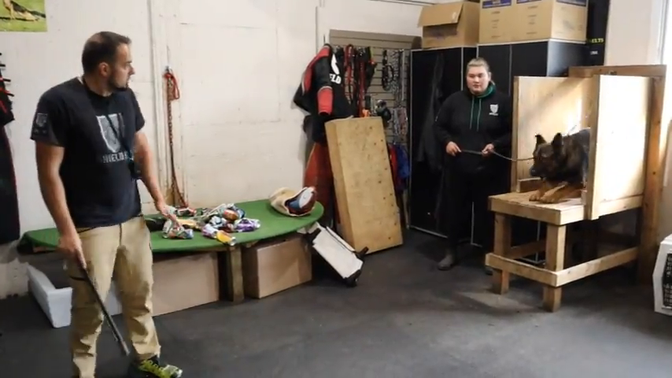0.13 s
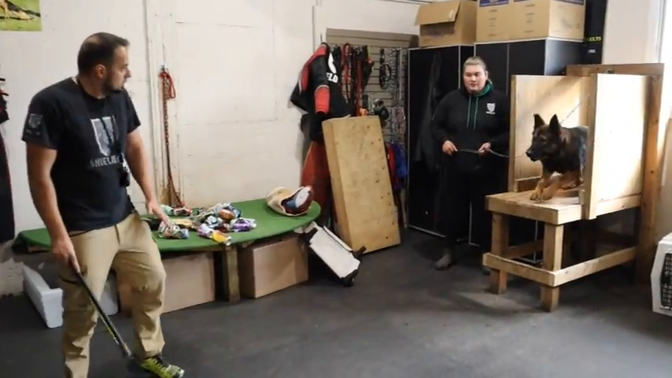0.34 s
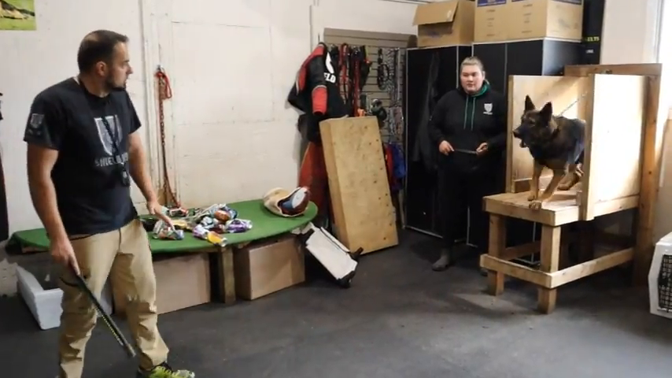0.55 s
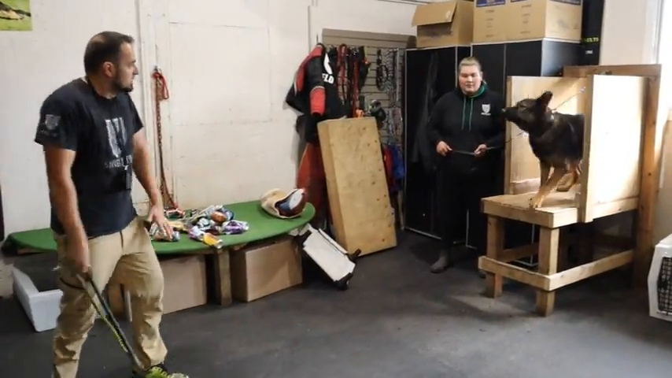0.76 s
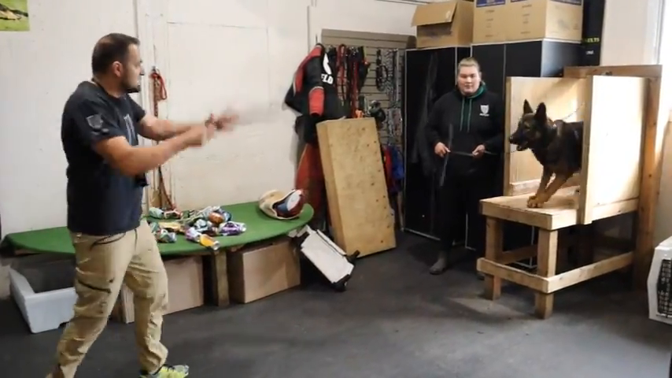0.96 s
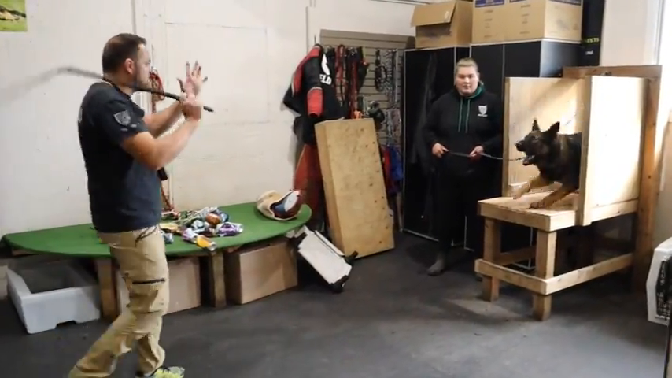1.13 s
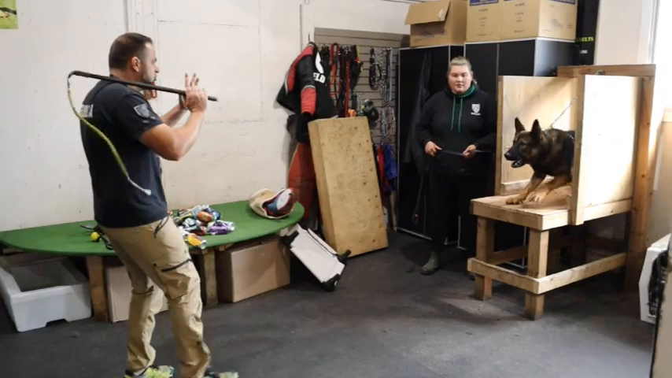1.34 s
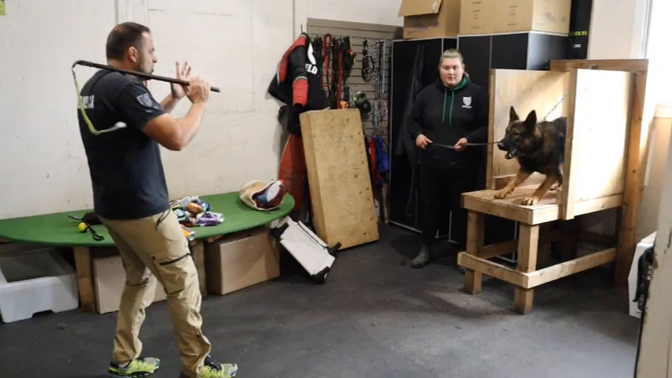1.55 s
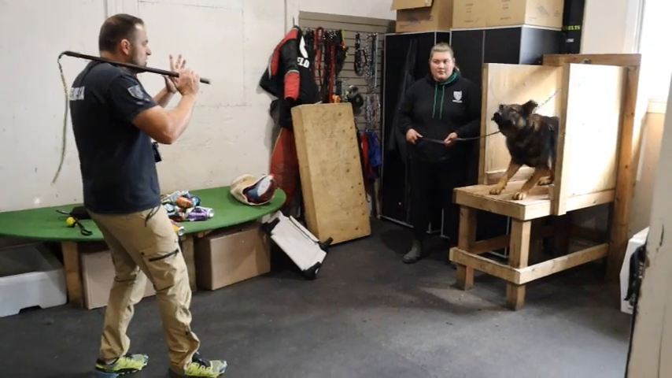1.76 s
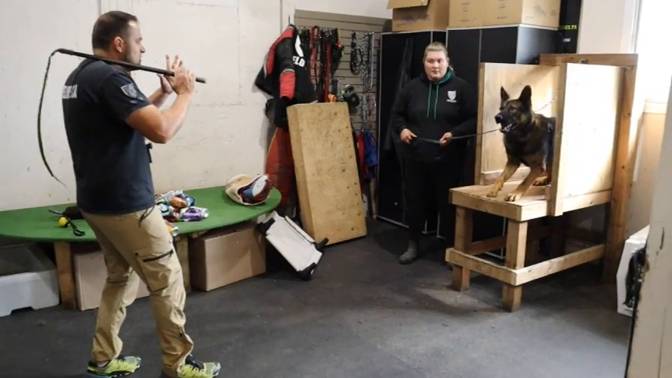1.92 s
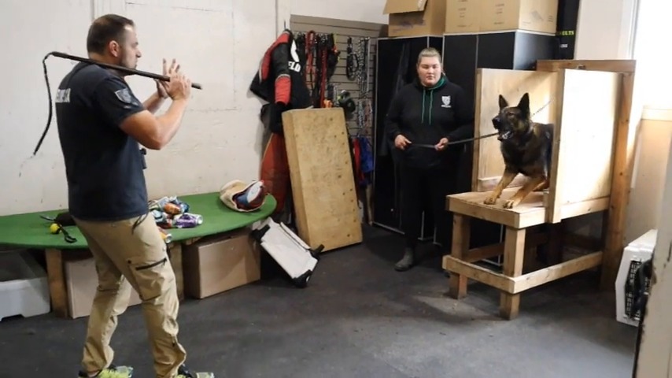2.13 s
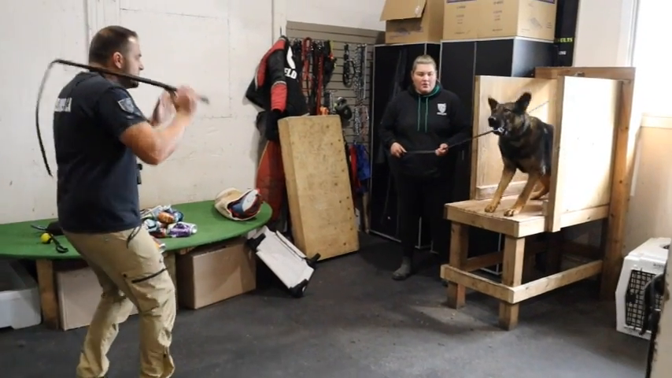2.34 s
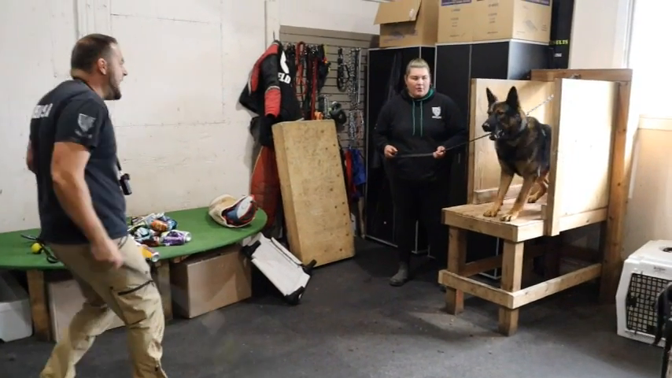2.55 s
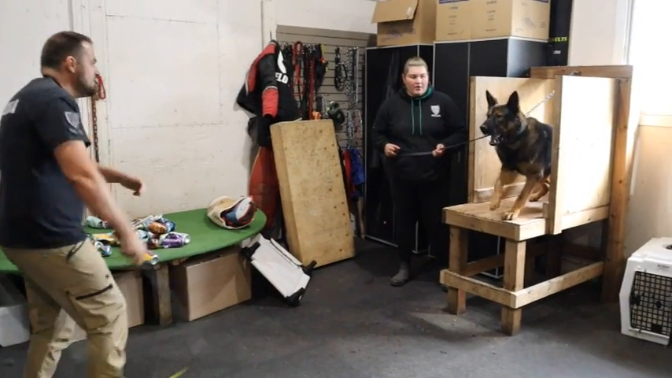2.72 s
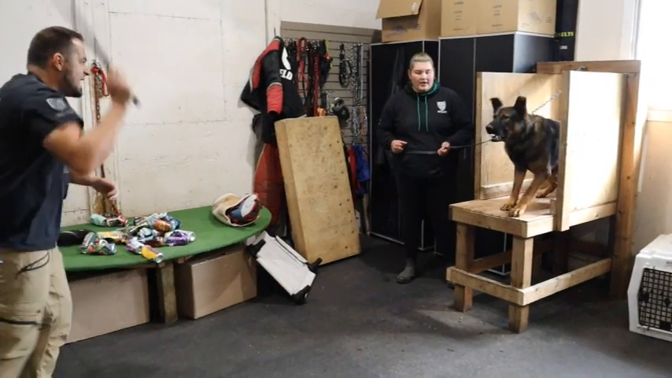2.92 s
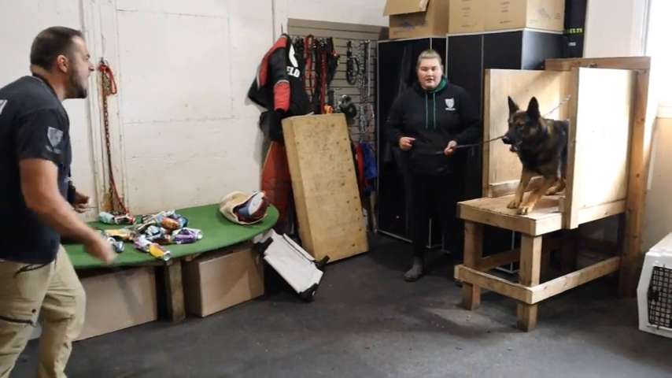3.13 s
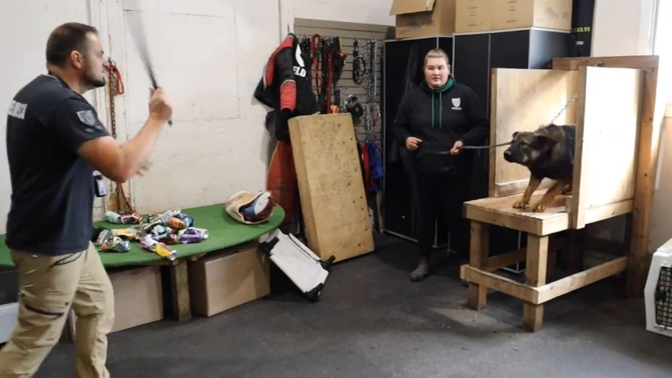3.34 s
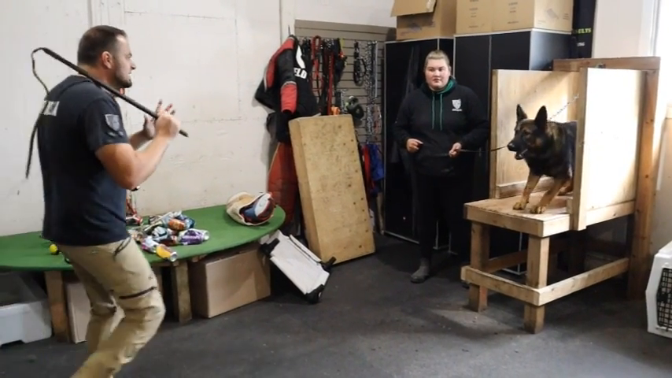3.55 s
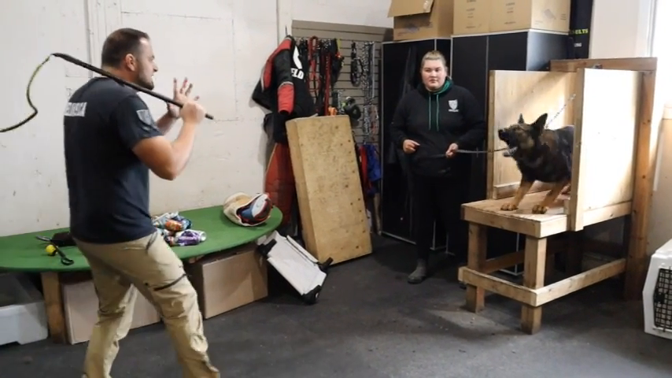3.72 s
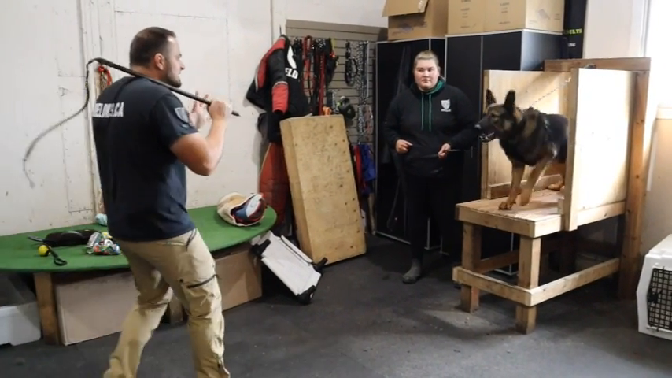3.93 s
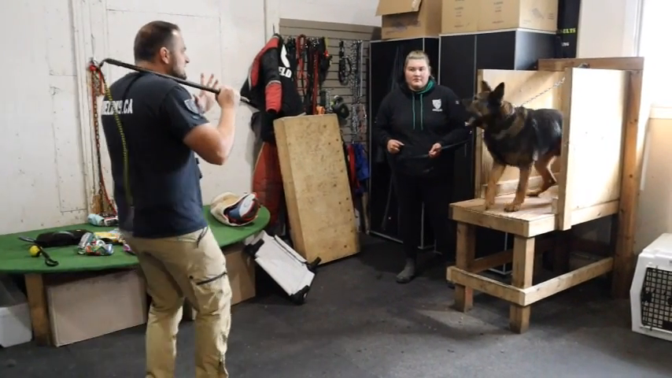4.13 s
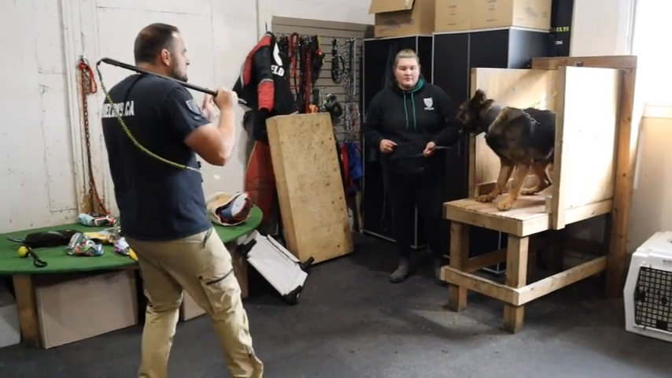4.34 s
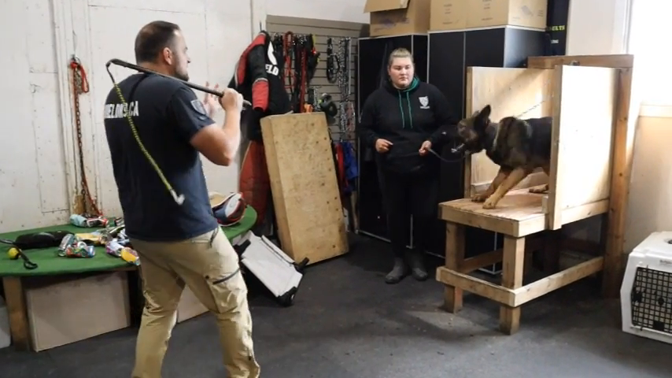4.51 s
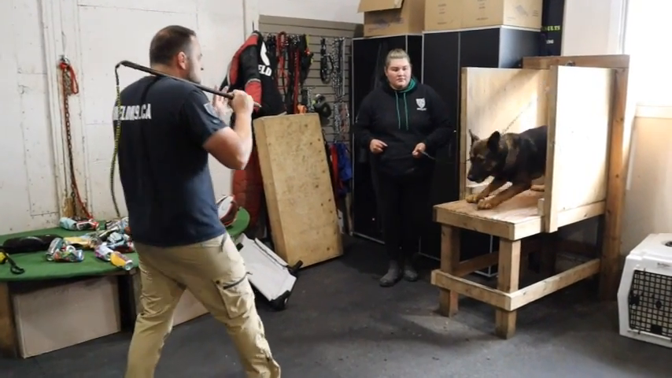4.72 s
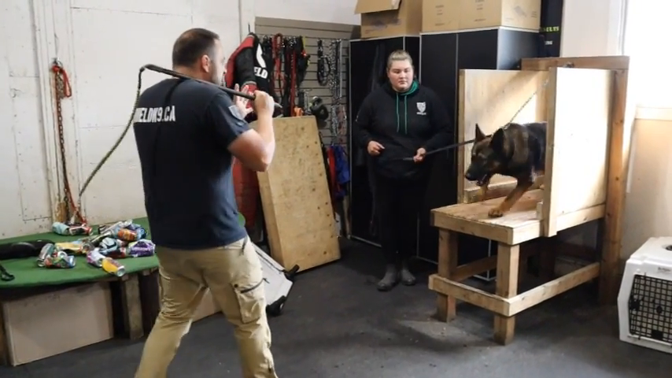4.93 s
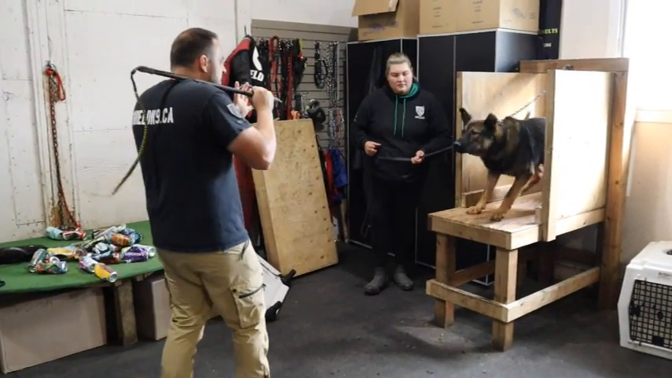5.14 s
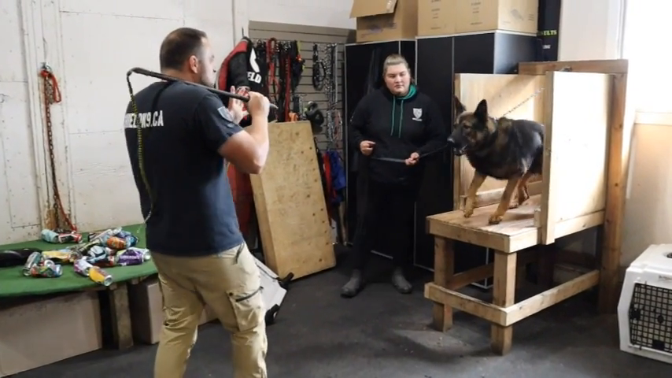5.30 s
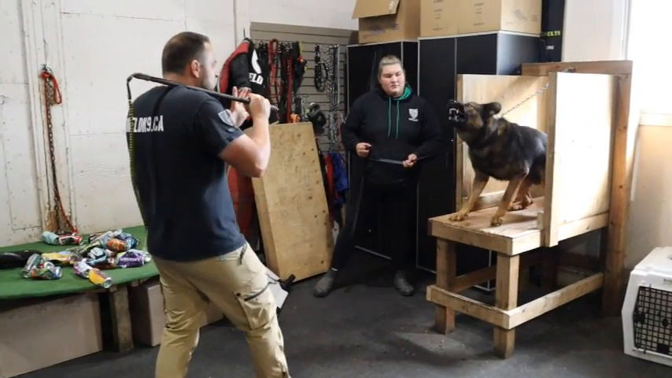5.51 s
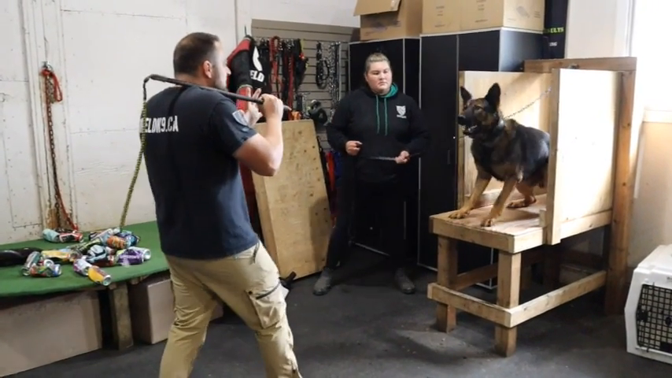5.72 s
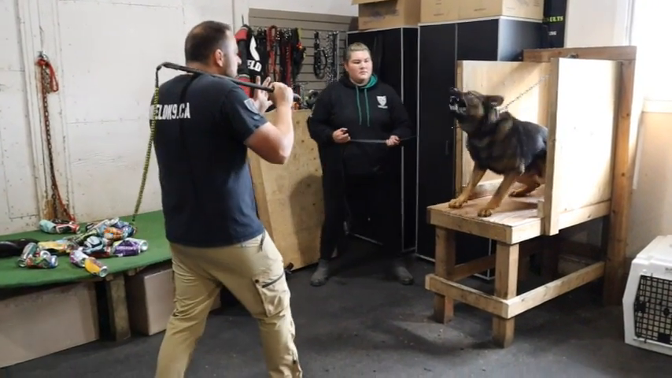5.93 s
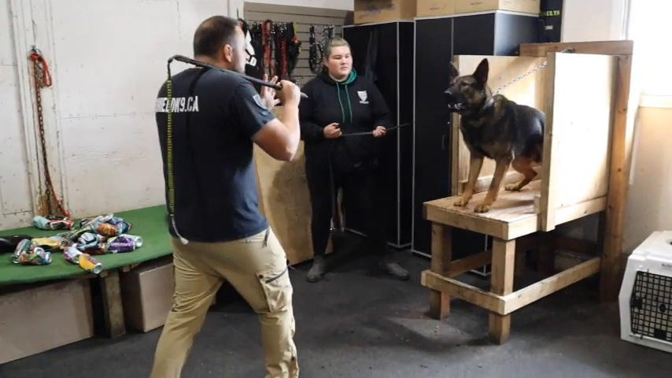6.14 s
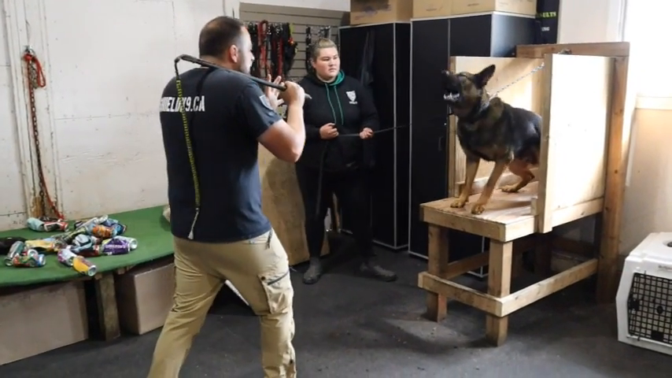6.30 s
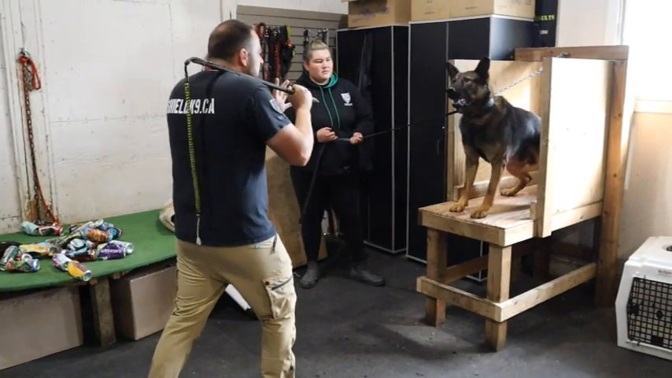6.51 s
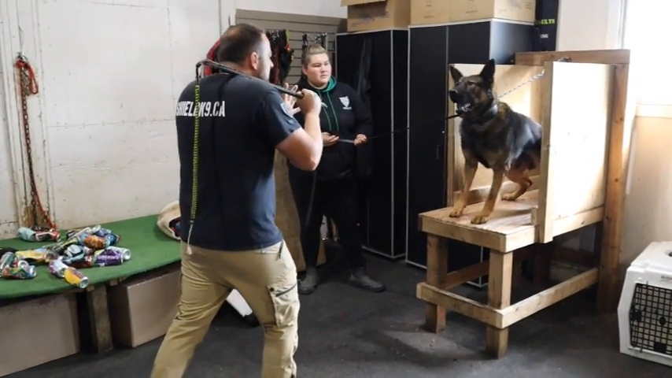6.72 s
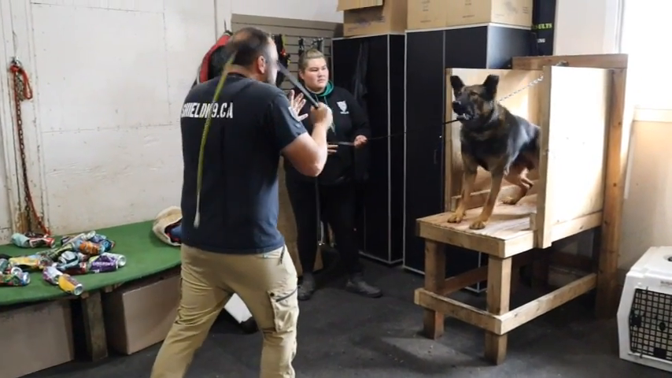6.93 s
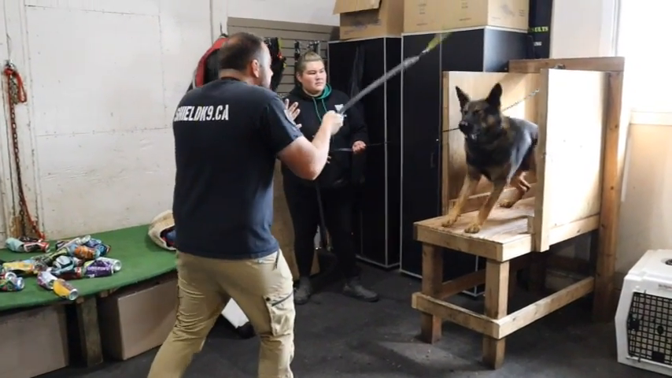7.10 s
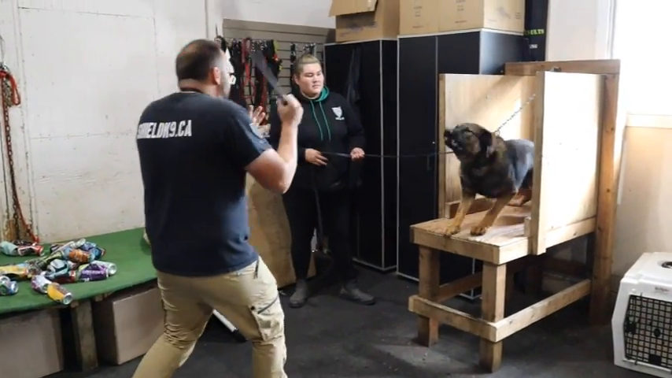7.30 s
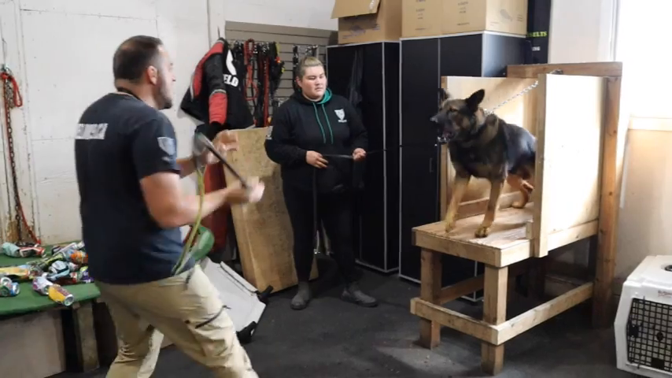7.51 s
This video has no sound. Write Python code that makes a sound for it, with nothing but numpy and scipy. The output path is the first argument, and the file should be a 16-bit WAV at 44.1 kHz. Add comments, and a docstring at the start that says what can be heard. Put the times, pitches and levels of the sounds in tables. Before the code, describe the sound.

A big dog barks throughout in a hard, echoing room, over quiet hum and hiss. The tail of a strong bark opens the sound, and a second, more distant dog answers loudly at about 0.2 s, then weaker at 0.5. The near dog's short, hoarse barks, each breaking upward in pitch, come at 0.7, 1.2, 1.7, 2.25 and 2.8 s. Claws scratch wood near 0.9 and 1.5, and a swish of air peaks at 1.3; fainter distant calls come around 2.5. At 3.15 s a whip cracks very close: an instant, piercing snap with a low thump and ringing echoes. The level drops slightly, then recovers after a hold. Barks continue roughly every half second, rumbling underneath, with faint distant answers and scratches around 4.2 to 5 and 6.2. A stronger swish peaks at 7.3, and barking is cut off near 7.6.

```python
"""A large dog barks fast in a hard-walled training room while a second dog answers from farther off.
A whip cracks once close to the microphones, and the gain drops on each side and recovers after a hold.
Voices are pulse trains and breath noise through throat and mouth filters; the crack is one shock pulse.
Paws, the swung whip and a low rumble are swells of filtered noise, over hum and hiss.
Echoes and a decaying tail make the room."""
import sys
import numpy as np
from scipy import signal
from scipy.fft import rfft, irfft, next_fast_len
from scipy.io import wavfile
from scipy.ndimage import uniform_filter1d, minimum_filter1d

SR = 44100
rng = np.random.default_rng(int(sys.argv[2]) if len(sys.argv) > 2 else 0)


def materialize(psi):
    """Save the field psi as 16-bit PCM at rate SR to the path in sys.argv[1].

    A 1-D psi becomes a single channel; in a 2-D psi each row is a channel.
    """
    bounded = np.clip(np.atleast_2d(psi).T, -1, 1)
    quanta = np.round(bounded * 32767).astype(np.int16)
    wavfile.write(sys.argv[1], SR, quanta)


N = 337806

# Levels of the sources are relative: room, stereo width and recorder act on them later.
# whip shock: start_s, level_db, time constant of the pressure pulse decay_s
SHOCK = (3.1443, 7.8, 0.000058)


def gain_of(db):
    """Decibels are twenty times the logarithm of an amplitude ratio."""
    return 10 ** (np.asarray(db) / 20)


def evened(x):
    """Normalization: equal mean power, with rms 1."""
    return x / np.sqrt(np.mean(x ** 2) + 1e-20)


def read(points, hz):
    """Logarithmic frequency: a spectrum is interpolated along equal pitch ratios."""
    point_hz, value = np.transpose(points)
    return np.interp(np.log(hz + 1), np.log(point_hz + 1), value)


def add(mix, start_s, sound):
    """Superposition: a sound is summed into the mix from a given time."""
    part = mix[round(start_s * SR):][:len(sound)]
    part += sound[:len(part)]


def coloured(x, points, size=2048):
    """Minimum-phase filter: the phase is the Hilbert transform of the log gain, so it is causal."""
    hz = abs(np.fft.fftfreq(size, 1 / SR))
    log_gain = np.log(gain_of(read(points, hz)))
    response = np.exp(np.conj(signal.hilbert(log_gain)))
    taps = np.fft.ifft(response).real
    return signal.oaconvolve(x, taps)[:len(x)]


def room(x, direct_db, walls_db, tail_db, side, build_s):
    """Reverberation: direct sound, wall echoes and a diffuse decaying tail, as mid and side."""
    # late decay: frequency_hz, t60_s
    late_decay = [(100, 1.1), (300, 1.11), (1000, 1.06), (2500, 0.98), (5000, 0.91), (8000, 0.7),
                  (14000, 0.27)]
    # first reflections: delay_s, level_db, side share from -1.2 to 0.93
    reflections = [(.0042, -10.5, .4), (.0085, -8.5, -1.2), (.0117, -5.5, 0.93), (.019, -5.5, -0.33),
                   (0.025, -1, 0.12), (.03, -7, -0.15)]
    taps = np.zeros((2, SR * 3 // 2))
    # sparse random signs: one pulse in every 20 samples
    at = np.arange(120, taps.shape[1] - 20, 20)
    at = at + rng.integers(0, 20, (2, len(at)))
    np.put_along_axis(taps, at, rng.choice([-1., 1.], at.shape), 1)

    hz, t, spectrum = signal.stft(taps, SR, nperseg=256)
    thickening = 1 - np.exp(-t / build_s)
    early_excess = 1 + 2.6 * np.exp(-t / 0.043)  # near surfaces fade first
    decay = gain_of(-60 * t / read(late_decay, hz)[:, None])
    tail = signal.istft(spectrum * thickening * early_excess * decay, SR, nperseg=256)[1]
    tail *= gain_of(tail_db) / np.linalg.norm(tail[0])

    tail[:, 0] += gain_of(direct_db) * np.array([1, side])
    for delay_s, level_db, share in reflections:
        tail[:, round(delay_s * SR)] += gain_of(walls_db + level_db) * np.array([1, share])
    return signal.fftconvolve(x[None], tail, axes=1)[:, :N]


def room_air():
    """Stationary noise: room hum and hiss, independent in mid and side."""
    # frequency_hz, level_db
    air_colour = [(40, -13.5), (120, -3.5), (300, 5), (1000, -10), (4000, -17), (9000, -20), (14000, -23)]
    noise = rng.standard_normal((2, N))
    return gain_of(-67.5) * np.array([evened(coloured(v, air_colour)) for v in noise])


def low_rumble():
    """Modulated noise: a low rumble that swells and dies, often along with the barks."""
    # swells: peak_s, level_db
    rumble_swells = [(0.16, -52), (0.36, -50), (0.79, -55.5), (1.198, -58), (1.351, -50), (1.8, -61.5),
                     (2.922, -54.5), (3.379, -52), (3.812, -47), (4.29, -50.5), (4.611, -46), (5.129, -47),
                     (5.588, -55), (6.029, -47.5), (6.452, -60.5), (6.908, -55), (7.332, -45.5)]
    # frequency_hz, level_db
    rumble_colour = [(40, -42.5), (90, -15.5), (130, -3), (200, -8.5), (300, -3), (1000, -86)]
    rise_db_per_s, fall_db_per_s = 197.5, 121.5
    peak_s, level_db = np.transpose(rumble_swells)[:, :, None]
    late_s = np.arange(N) / SR - peak_s
    slope_db = np.minimum(rise_db_per_s * late_s, -fall_db_per_s * late_s)
    swell = gain_of((level_db + slope_db).max(0))  # the loudest swell sets the level
    noise = rng.standard_normal((2, N))
    return swell * np.array([evened(coloured(v, rumble_colour)) for v in noise])


def paws():
    """Friction noise: paws and claws on the wooden stand give short scratches that swell and die."""
    # taps: start_s, level_db at the peak, time to the peak peak_s
    scratches = [(0.941, -44, 0.0034), (1.476, -44, 0.0055), (3.596, -62, 0.011), (3.693, -53, 0.0089),
                 (4.211, -43, 0.0013), (4.736, -42.5, 0.0083), (4.869, -45.5, 0.0066), (4.991, -45, 0.0084),
                 (6.216, -46.5, 0.0053)]
    # frequency_hz, level_db
    wood_colour = [(100, -14.5), (300, 0.5), (2000, -4.5), (3500, -5), (6000, -10.5), (13000, -31.5)]
    out, t = np.zeros(N), np.arange(4000) / SR
    for start_s, level_db, peak_s in scratches:
        scratch = evened(coloured(rng.standard_normal(len(t)), wood_colour))
        swell = np.e * t / peak_s * np.exp(-t / peak_s)
        add(out, start_s, gain_of(level_db) * scratch * swell)
    return out


def whip_swishes():
    """Turbulence: air swishing round whip and cloth is noise that swells to a peak and fades."""
    # swishes: peak_s, level_db, rise_s, fall_s
    swishes = [(1.281, -38, 0.22, 0.071), (2.64, -51.5, 0.25, 0.29), (4.8, -57, 0.44, 0.71),
               (6.26, -56, 0.059, 0.15), (6.78, -59, 0.55, .08), (7.332, -35.5, 0.11, 0.034)]
    # frequency_hz, level_db
    swish_colour = [(100, -22.5), (600, 11), (2500, -1.5), (3500, -4.5), (5000, -9), (8000, -15.5),
                    (13000, -29.5)]
    edge_db = -24  # below the peak where rise and fall end
    swell, t = np.zeros(N), np.arange(N) / SR
    for peak_s, level_db, rise_s, fall_s in swishes:
        away = np.maximum((peak_s - t) / rise_s, (t - peak_s) / fall_s)
        swell += gain_of(level_db + edge_db * away)
    return swell * evened(coloured(rng.standard_normal(N), swish_colour))


def whip_crack():
    """Shock wave: a pressure jump that falls through zero, after two faint clicks just before it."""
    # frequency_hz, level_db
    shock_colour = [(60, -12.5), (500, -1), (2000, -0.5), (5000, -1.5), (8000, -4), (11000, -6.5),
                    (13000, -12), (15000, -28)]
    # clicks: lead before the shock lead_s, gain before differencing relative to the shock gain_db
    clicks = [(0.0058, -20.5), (0.0034, -27.5)]
    start_s, level_db, decay_s = SHOCK
    u = np.arange(400) / SR / decay_s
    pulse = (1 - u) * np.exp(-u)
    out = np.zeros(N)
    add(out, start_s, gain_of(level_db) * pulse)
    for lead_s, gain_db in clicks:
        add(out, start_s - lead_s, gain_of(level_db + gain_db) * np.diff(pulse))
    return coloured(out, shock_colour)


def membrane_thump():
    """Damped oscillation: the blast pushes the microphone membrane in and it swings back."""
    # level_db, frequency_hz, t60_s
    swing = (-10.5, 87, 0.014)
    level_db, hz, t60_s = swing
    t, out = np.arange(4000) / SR, np.zeros(N)
    decay = gain_of(level_db - 60 * t / t60_s)
    attack = np.minimum(t / 0.00073, 1)
    add(out, SHOCK[0], -decay * np.sin(2 * np.pi * hz * t + 1.83) * attack)
    return out


def voice(calls, throat, rasp, jitter, rasp_growth):
    """Source and filter: vocal-fold pulses and a puff of breath each cycle pass throat and mouth."""
    # the front of the mouth, which rings more as the jaws open: frequency_hz, level_db
    mouth = [(600, -37.5), (1200, -20), (1450, -5.5), (1750, -6), (2100, -13.5), (2350, -19), (2700, -37.5),
             (14000, -76.5)]
    rasp_voiced, rasp_breath = .5, .8  # shares in the rasp
    out = np.zeros(N)
    for corners in calls:
        corner_s, *columns = np.transpose(corners)
        t = np.arange(max(corner_s[0] - .018, 0), corner_s[-1], 1 / SR)
        effort_db, hz, rough, jaws_db = (np.interp(t, corner_s, c) for c in columns)
        rough = np.clip(rough, 0, 1)

        wobble = evened(uniform_filter1d(rng.standard_normal(len(t)), size=130))
        turns = np.cumsum(hz * (1 + jitter * rough * wobble)) / SR
        folds = np.cos(2 * np.pi * np.arange(1, 16)[:, None] * turns).sum(0)  # 15 harmonics
        puffs = evened((0.37 + np.exp(-(turns % 1) / 0.32)) * rng.standard_normal(len(t)))
        # shimmer: uneven strength of the beats
        unevenness = evened(uniform_filter1d(rng.standard_normal(len(t)), size=200))
        shimmer = 1 + 1.8 * rough * unevenness
        drive = (1 - rough) * shimmer * evened(folds) + rough * puffs

        sound = coloured(drive, throat) - gain_of(jaws_db) * coloured(drive, mouth)
        # the rasp grows faster than the voice with effort
        rasp_gain = gain_of(rasp_growth * (effort_db + 14.0))
        sound += rasp_gain * coloured(rasp_voiced * drive + rasp_breath * puffs, rasp)
        soft_start = np.clip((t - corner_s[0] + 0.02) / 0.029, 0, 1) ** 2
        close = np.clip((corner_s[-1] - t) / 0.0068, 0, 1)
        add(out, t[0], gain_of(effort_db + 2.0) * sound * soft_start * close)
    return out


def answer(start_s, peak_s, length_s, effort_db, first_hz, peak_hz, last_hz, jaw_db):
    """Effort contour: corners of a call that swells and fades: time_s, effort_db, pitch_hz, rough, jaw_db."""
    glide_up, glide_down = .65, 0.35  # share of each glide done halfway
    rough_ends, rough_peak = .15, .27
    s = start_s + np.array([0, peak_s / 2, peak_s, (peak_s + length_s) / 2, length_s])
    under_db = np.array([-12.5, -5.5, 0, -5.5, -11.5])  # under the peak
    hz = [first_hz, first_hz + glide_up * (peak_hz - first_hz), peak_hz,
          peak_hz + glide_down * (last_hz - peak_hz), last_hz]
    rough = [rough_ends] + [rough_peak] * 3 + [rough_ends]
    return np.transpose([s, effort_db + under_db, hz, rough, jaw_db + 0 * s])


def far_dog():
    """Phonation at lower effort: the second dog's calls swell, glide in pitch and fade."""
    # calls: start_s, peak_after_s, length_s, effort_db, first_hz, peak_hz, last_hz, jaw_opening_db
    answers = [ (0.163, 0.088, 0.19, -7.5, 276.3, 468.4, 348, -7),
               (0.49, 0.085, 0.27, -18, 345.4, 425.2, 433.6, -9.5),
               (2.429, 0.093, 0.24, -31, 305.8, 327.3, 319.4, -7),
               (2.636, 0.14, 0.26, -22.5, 375.2, 443.5, 440, -6.5),
               (3.966, 0.017, 0.11, -24.5, 376, 384.2, 365.5, -26),
               (4.206, 0.059, 0.23, -20, 401.3, 438.5, 396.7, -12),
               (4.775, 0.039, 0.19, -27.5, 425.6, 470.3, 486, -17),
               (4.903, 0.05, 0.12, -31, 339.4, 335, 286, -6.5),
               (5.324, 0.037, 0.055, -24.5, 442, 436, 436, -15),
               (6.138, 0.054, 0.15, -23.5, 366, 445, 394, -13),
               (6.681, 0.06, .14, -27, 439, 462, 443, -0.5), (7.48, 0.096, 0.13, -30, 406.5, 392, 405, -5),
               ]
    # throat and open mouth: frequency_hz, level_db
    far_throat = [(100, -49.5), (280, -16), (430, -12.5), (620, 3.5), (850, -3.5), (1300, -9), (1800, -30),
                  (2400, -42.5), (14000, -84.5)]
    # rasp: frequency_hz, level_db
    far_rasp = [(1000, -51), (2500, -32), (3500, -28), (4500, -36), (6500, -37.5), (10000, -45),
                (14000, -63.5)]
    calls = [answer(*row) for row in answers]
    return voice(calls, far_throat, far_rasp, jitter=0.079, rasp_growth=0.31)


def bark(start_s, break_s, length_s, low_hz, high_hz, low_db, high_db, late_db, jaw_db, late_jaw_db):
    """Register break: corners of a bark that jumps in pitch: time_s, effort_db, pitch_hz, rough, jaw_db."""
    onset_s, jump_s, close_s = 0.0181, .018, .025
    # pitch shares: up into the onset, up in each register, down at the close
    scoop, low_climb, high_climb, drop = 0.0761, 0.036, 0.0329, 0.12
    onset_db, low_swell_db, close_db = -7.5, 1.5, -9.5
    rough_low, rough_break, rough_high, rough_close = .3, .27, .34, .5
    jaw_sink_db, jaw_shut_db = -7.5, -5  # jaws narrower than just after the break
    end_s = start_s + length_s
    return [(start_s, low_db + onset_db, low_hz * (1 - scoop), rough_low, jaw_db),
            (start_s + onset_s, low_db, low_hz, rough_low, jaw_db),
            (start_s + max(break_s, onset_s), low_db + low_swell_db, low_hz * (1 + low_climb),
             rough_break, jaw_db),
            (start_s + break_s + jump_s, high_db, high_hz, rough_break, late_jaw_db),
            (end_s - close_s, late_db, high_hz * (1 + high_climb), rough_high,
             late_jaw_db + jaw_sink_db),
            (end_s, late_db + close_db, high_hz * (1 - drop), rough_close, late_jaw_db + jaw_shut_db)]


def near_dog():
    """Phonation at high effort: each bark of the large dog breaks upward into a higher register."""
    # barks: start_s, break_after_s, length_s, low_pitch_hz, high_pitch_hz, effort_before_break_db,
    # effort_after_break_db, effort_before_close_db, jaw_before_break_db, jaw_after_break_db
    barks = [ (-0.06, 0.044, 0.095, 440, 453, -18, -1.5, -6.5, -9.5, -2),
             (0.701, 0.026, 0.13, 378.6, 487.4, -11.5, -7, -14.5, 0, -6),
             (1.189, 0.033, 0.14, 335.5, 503.5, -14.5, -7.5, -12, 1.5, -15.5),
             (1.703, 0.044, 0.13, 341.8, 502, -13.5, -8.5, -12, 0.5, -8),
             (2.252, 0.044, 0.098, 335.1, 501.5, -14, -2.5, -12, 0, -6.5),
             (2.796, 0.056, 0.12, 352.4, 517.5, -14.5, -4.5, -16, -1.5, -4),
             (3.298, 0.039, 0.14, 335.1, 483.1, -13, -9, -13, 5, -5),
             (3.765, .04, 0.14, 344, 507, -12, -5.5, -11.5, 0.5, -19),
             (4.245, 0.039, 0.1, 346.5, 453.6, -14, -14.5, -12.5, -6.5, -19),
             (4.547, 0.037, .13, 341.2, 500, -12.5, -7.5, -12.5, -2.5, -13),
             (5.037, .035, 0.12, 359.7, 508.3, -12, -8, -12.5, 10, -3),
             (5.501, .03, .13, 347.9, 501.2, -14, -10, -12.5, 1, -3),
             (5.939, 0.037, 0.11, 344.4, 523.7, -12, -8, -9, 3, -2.5),
             (6.337, .035, 0.12, 339.2, 526.5, -15, -6.5, -11.5, 2.5, -2),
             (6.822, 0.032, 0.11, 341.5, 523.4, -14.5, -8, -11, 3, -4.5),
             (7.282, 0.055, 0.12, 334.5, 522, -13, -10, -11.5, 6.5, -4),
             (7.582, 0.023, 0.05, 377.5, 496, -17, -8.5, -14.5, -2, -9), ]
    # throat and open mouth: frequency_hz, level_db
    near_throat = [(100, -39.5), (330, -17.5), (510, -10), (620, 2.5), (740, 2.5), (880, -1.5), (1025, 1),
                   (1130, -3), (1260, -5), (1600, -13), (2050, -22), (2500, -61), (14000, -76.5)]
    # rasp: frequency_hz, level_db
    near_rasp = [(1000, -66.5), (2300, -24), (2700, -26), (3200, -29.5), (3900, -32.5), (4700, -34.5),
                 (6500, -35.5), (10000, -41), (12500, -45.5), (14500, -70)]
    calls = [bark(*row) for row in barks]
    return voice(calls, near_throat, near_rasp, jitter=.125, rasp_growth=.5)


def widened(mid_side):
    """Stereo width: where side outweighs mid, in the treble, the two channels are out of phase."""
    # frequency_hz, side minus mid gain level_db
    width_points = [(60, -14.5), (125, -14), (250, -13), (490, -12), (1130, -4), (1700, 0.5), (2600, 4.5),
                    (5500, 6), (9000, 8), (14000, 1.5)]
    size = next_fast_len(N)
    width = gain_of(read(width_points, np.fft.rfftfreq(size, 1 / SR)))
    share = np.array([np.ones_like(width), width]) / np.sqrt(1 + width ** 2)
    return irfft(rfft(mid_side, size) * share, size)[:, :N]


def scene():
    """Superposition: all sources sum as mid and side, then become left and right."""
    mix = room_air() + low_rumble()
    mix += room(whip_swishes(), direct_db=-7.5, walls_db=-1.5, tail_db=8.5, side=0.32, build_s=0.0051)
    mix += room(whip_crack(), direct_db=-11, walls_db=-7, tail_db=1.5, side=-.5, build_s=.02)
    mix += room(far_dog(), direct_db=1.5, walls_db=-4.0, tail_db=-3.0, side=-.6, build_s=.02)
    mix += room(near_dog() + paws(), direct_db=-6.0, walls_db=-8.5, tail_db=-1.0, side=0.22,
                build_s=0.0032)
    mid, side = widened(mix)
    mid = mid + membrane_thump()
    return np.array([mid + side, mid - side])


def held(over_db, hold_s, db_per_s):
    """Peak hold: follows a rise at once, holds, and lets go at a steady rate."""
    fall_db = np.arange(N) * db_per_s / SR
    let_go = np.maximum(np.maximum.accumulate(over_db + fall_db, axis=1) - fall_db, 0)
    size = round(hold_s * SR) // 2 * 2 + 1
    return -minimum_filter1d(-let_go, size, axis=1, origin=size // 2)


def power_level(x, size):
    """Short-time power: the running mean square in decibels."""
    return 10 * np.log10(abs(uniform_filter1d(x ** 2, size=size, axis=1)) + 1e-12)


def record(dry):
    """Nonlinear input stage: overload rumble, quick and slow gain control, soft clipping, band limit."""
    # square-law overload, stronger once the crack has shaken the stage: time_s, level_db
    overload = [(0, -37), (3.101, -48.5), (3.3, -4.5), (5.001, -10.5), (7.66, -9)]
    strength = gain_of(np.interp(np.arange(N) / SR, *np.transpose(overload)))
    rumble_band = signal.butter(3, [55, 260], "bandpass", fs=SR, output="sos")
    rumble = signal.sosfilt(rumble_band, dry.mean(0) ** 2)

    quick_db = 0.39 * held(power_level(dry, 400) + 26.5, hold_s=0.006, db_per_s=70.5)
    treble = signal.sosfilt(signal.butter(6, 4000, "highpass", fs=SR, output="sos"), dry)
    over_db = held(power_level(treble, 2000) + 38, hold_s=1.55, db_per_s=30.)
    slow_db = np.minimum(over_db, [[1.0], [3.5]])  # treble blasts trip a step, deeper on the right
    reduction_db = uniform_filter1d(quick_db + slow_db, size=60, axis=1)
    ducked = dry * gain_of(3.5) / gain_of(reduction_db)

    clipped = 1.763 * np.tanh((ducked + strength * rumble) / 0.85)
    lowpass = signal.firwin(511, 15100, window=("kaiser", 9), fs=SR)  # edge in Hz
    return signal.oaconvolve(clipped, lowpass[None], "same")


dry = scene()
out = record(dry)
materialize(out)
```